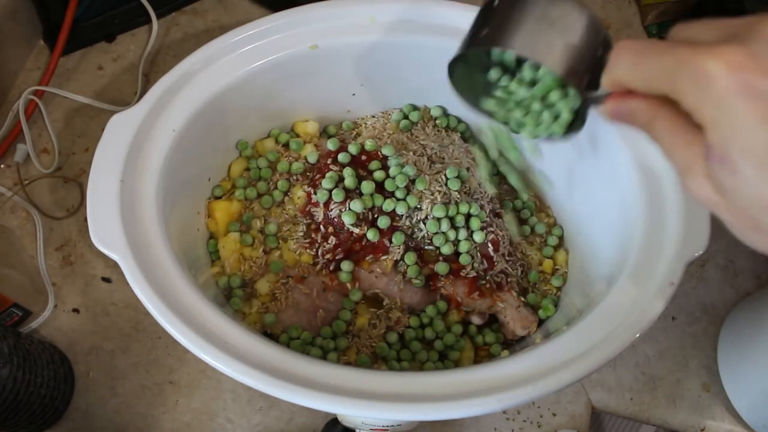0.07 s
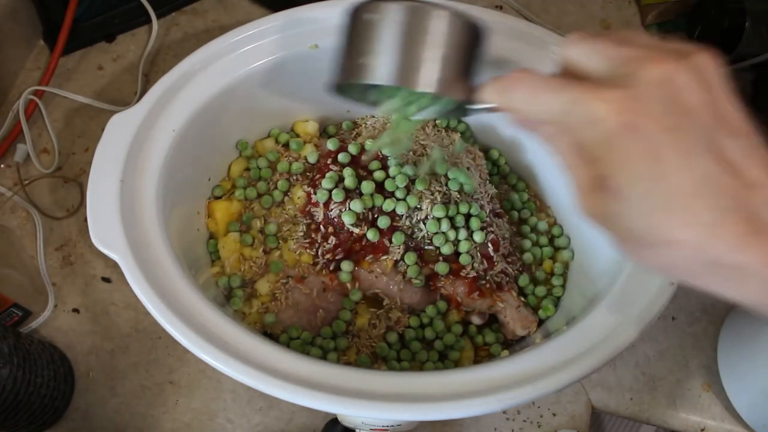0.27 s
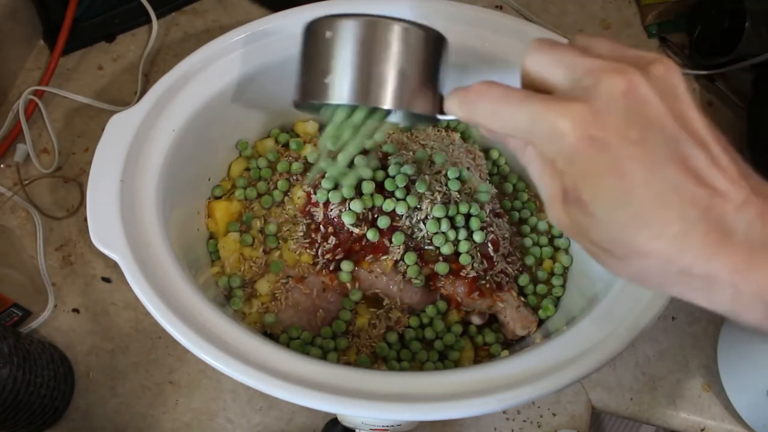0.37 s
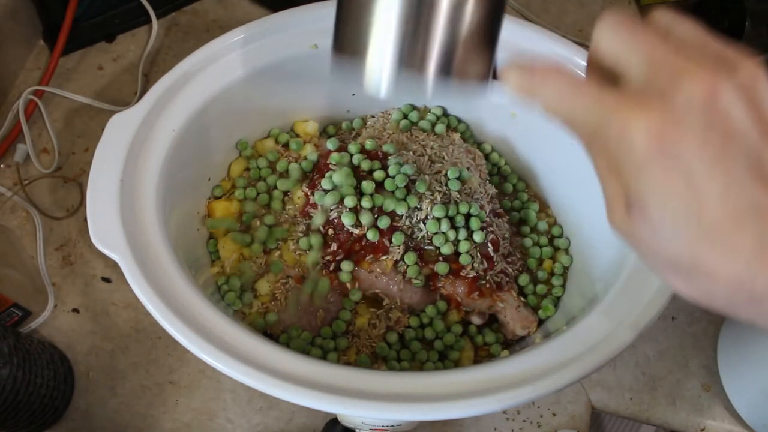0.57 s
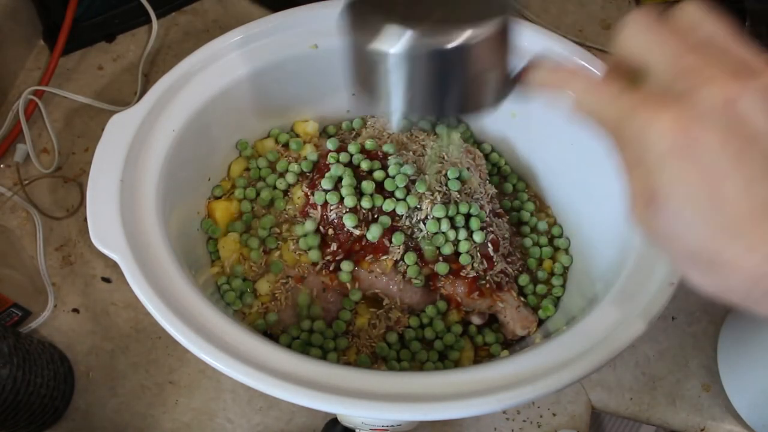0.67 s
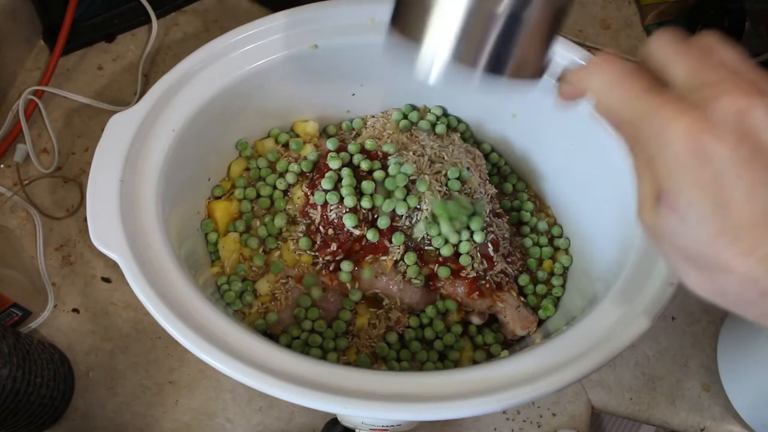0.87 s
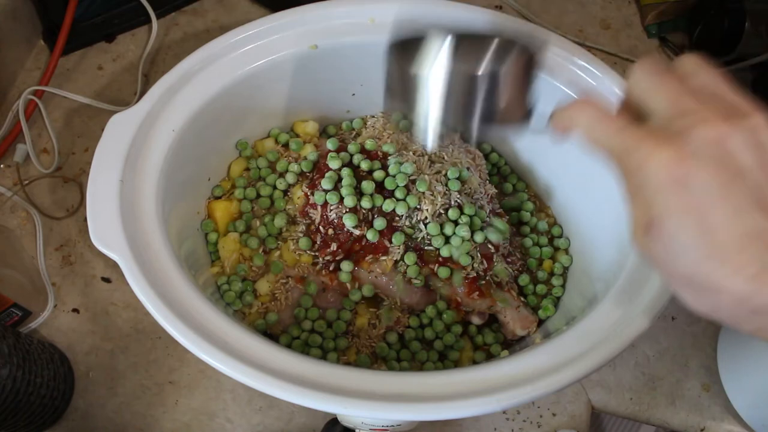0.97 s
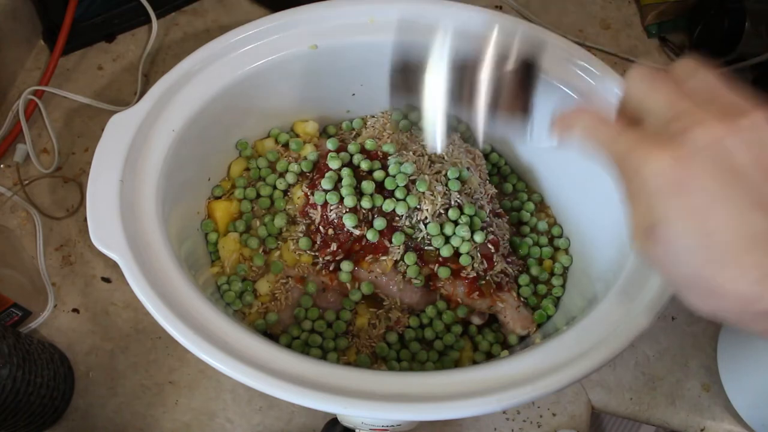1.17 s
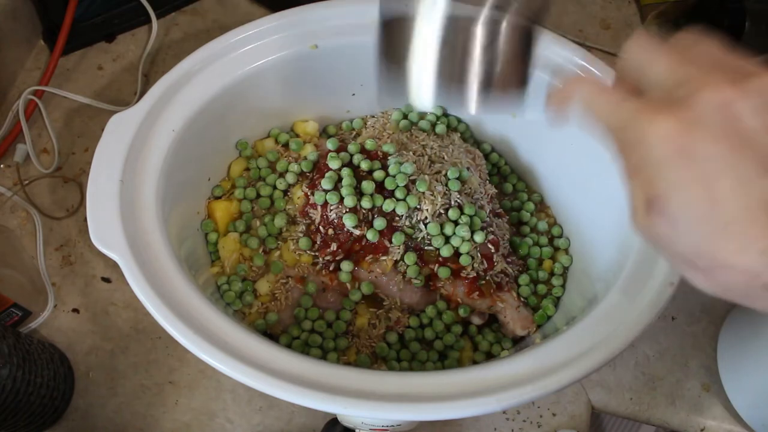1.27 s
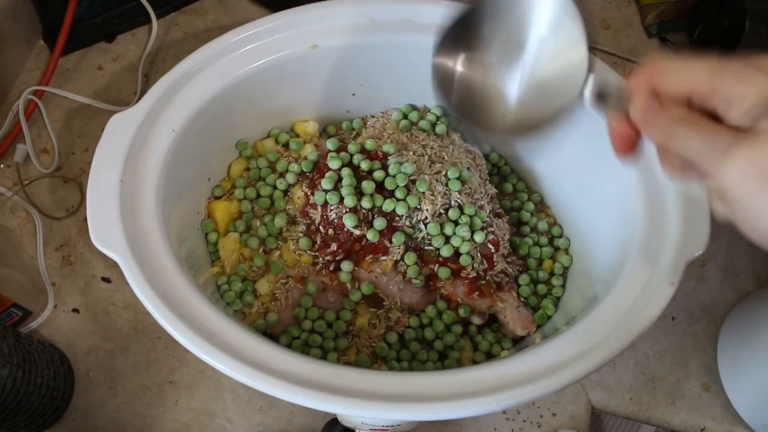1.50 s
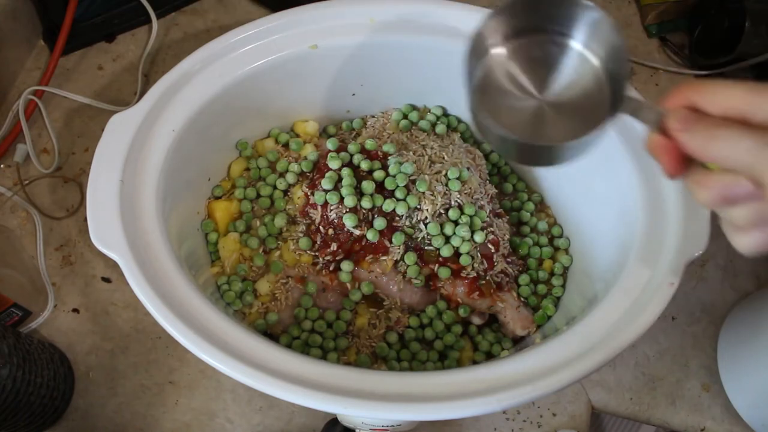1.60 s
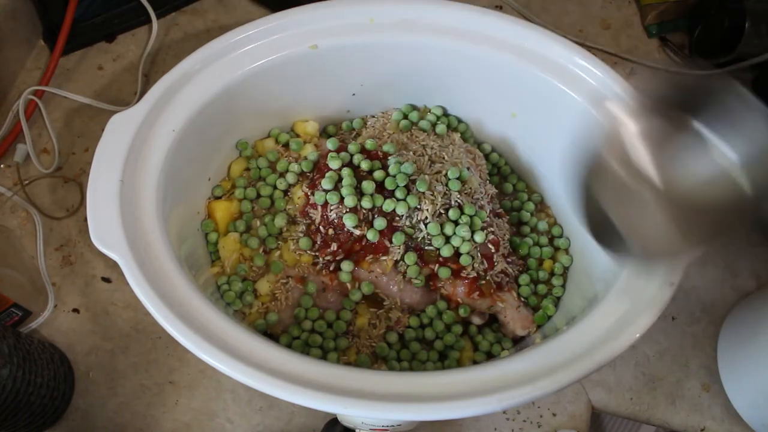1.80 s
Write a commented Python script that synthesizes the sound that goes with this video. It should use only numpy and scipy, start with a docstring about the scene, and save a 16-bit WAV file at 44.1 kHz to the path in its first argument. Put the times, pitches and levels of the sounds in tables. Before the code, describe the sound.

Frozen peas rattle from a metal cup onto food, then the cup clinks and rings.

```python
"""Frozen peas pour from a steel measuring cup onto food in a stoneware crock: a stream of small
impacts that tick, patter and excite the cup's damped modes. The emptied cup is knocked on the crock,
sheds its last peas and rings on in free vibration, fading in and out as the hand swings it away.
Crock and kitchen add reflections; an appliance hums over room noise and a few faint thuds.
An automatic gain control ducks under the clink."""
import sys
import numpy as np
from scipy import signal
from scipy.fft import rfft, irfft
from scipy.io import wavfile

SR = 44100
rng = np.random.default_rng(int(sys.argv[2]) if len(sys.argv) > 2 else 0)


def persist_wave(psi):
    """Save psi, clipped to +-1, as 16-bit WAV."""
    counts = np.round(np.clip(psi, -1, 1) * 32767).astype(np.int16)
    wavfile.write(sys.argv[1], SR, np.atleast_2d(counts).T)


N = 81585
TIME = np.arange(N) / SR

# Levels in the tables are relative; each source applies its own gain.
# envelope of the peas rattling along the cup: time_s, level_db
POUR_ENVELOPE = [(0, -45.5), (.045, -43), (.065, -33), (.16, -33), (.19, -37), (.25, -26), (.31, -37),
                 (.345, -34.5), (.43, -35), (.46, -29), (.5, -35.5), (.54, -30.5), (.59, -27), (.63, -30.5),
                 (.68, -27.5), (.7, -37.5), (.735, -32.5), (.76, -43.5), (.82, -44)]
# envelope of the last peas dropping and rolling on the food: time_s, level_db
LAST_PEAS_ENVELOPE = [(.9, -34), (1.01, -42), (1.028, -38), (1.045, -45), (1.065, -38), (1.1, -43.5),
                      (1.122, -42.5), (1.14, -39.5), (1.165, -33.5), (1.195, -39), (1.235, -40),
                      (1.255, -55.5), (1.272, -44), (1.31, -58.5)]
# spectrum of a pea's tick: frequency_hz, level_db
TICK_SPECTRUM = [(300, -12.5), (900, -25), (1700, -8.5), (3200, -10), (5500, -5.5), (8300, -1),
                 (11000, -15), (13000, -22), (15500, -30.5)]
# spectrum of peas landing on food: frequency_hz, level_db
PATTER_SPECTRUM = [(300, -5.5), (520, 5), (750, -1.5), (1400, 9), (2600, 6.5), (4200, 11.5), (6000, -3.5),
                   (8300, -6.5), (11000, -16.5), (15500, -30)]
# modes of the cup damped by its load: pitch_hz, level_db, t60_s, emptying_db_per_s
LOADED_CUP_MODES = [(891.5, -23.5, 0.11, -8), (1053, -13.5, 0.038, -16), (1388, -17, 0.042, 9),
                    (1690, -19, .03, 9.5), (2824, 2, 0.022, -16), (2973, -2.5, 0.029, -16.5),
                    (3398, -4.5, 0.055, 13.5), (4202, -2.5, 0.045, 13.5), (5050, -27, 0.032, 5),
                    (5300, -6.5, 0.012, 22.5), (6830, -9.5, 0.013, 8), (7320, -12, 0.031, -7),
                    (8030, -10, 0.017, -6), (9110, -34, 0.016, 1)]
# impacts of single hard peas: start_s, tick_db, ping_db
PEA_IMPACTS = [(.003, -50, -25), (0.0639, -27, -20.5), (0.157, -18.5, -17.5), (0.2034, -25.5, -14),
               (0.24, -25, -30), (0.2515, -17, -31), (0.2863, -13.5, -15), (0.289, -17, -31),
               (.320, -23, -49), (0.3268, -15, -17), (0.3385, -19.5, -25), (0.3942, -21, -15),
               (.441, -21.5, -13), (0.449, -13, -10), (.456, -44, -11), (0.511, -20, -31),
               (0.5473, -20.5, -47), (0.565, -16.5, -19), (0.584, -22, -42), (0.587, -22, -8.5),
               (0.599, -20.5, -7), (0.612, -20, -16.5), (0.6484, -37, -9), (0.6665, -38, -28),
               (0.674, -27, -10), (0.68, -20.5, -17), (0.713, -22, -29), (.7742, -20, -43),
               (0.7939, -21, -25.5), (.8097, -33, -6.5), (.93, -17, -16.5), (0.949, -20.5, -22),
               (1.025, -31, -34), (1.050, -33.5, -34), (1.127, -28, -31), (1.136, -37.5, -13.5),
               (1.141, -27.5, -26), (1.174, -31, -25.5), (1.187, -32.5, -19.5), (1.198, -33, -31.5),
               (1.266, -47.5, -22.5), (1.36, -43, -38.5), (1.637, -49, -58)]

# partials of the appliance: pitch_hz, level_db
HUM_PARTIALS = [(59.2, -51.5), (118.4, -55), (177.6, -53.5), (226.1, -50), (344.5, -56), (710.6, -54.5),
                (850.6, -68)]
# spectrum of the room's low noise: frequency_hz, level_db
RUMBLE_SPECTRUM = [(15, -65), (25, -18.5), (44, -7.5), (108, -10.5), (147, -13), (216, -2.5), (255, -11.5),
                   (645, -16), (702, -21.5), (1400, -23.5), (1820, -51), (3080, -120)]
# spectrum of the steady hiss: frequency_hz, level_db
HISS_SPECTRUM = [(800, -0.5), (1500, 3), (3000, 1), (6000, -7.5), (10000, -12.5), (15500, -17.5)]

# dull knocks on the crock: start_s, level_db, brightness_db_per_octave
CROCK_KNOCKS = [(.2035, -19, 2), (.2212, -11, -7), (.226, -19, 11), (.2395, -25, -23), (.3275, -17, 14),
                (.3405, -24, 34.5), (.8138, -27, 5), (.8202, 7, -1.5), (1.061, -17.5, 18.5),
                (1.085, -31.5, -12.5), (1.109, -24, -2.5)]
# modes of the stoneware: pitch_hz, level_db, t60_s
CROCK_MODES = [(496, -39.5, 0.016), (853.6, -22.5, 0.21), (1083, -4.5, 0.048), (1187, -3, 0.026),
               (1460, -10.5, 0.052), (1719, -5.5, 0.033), (1820, -29, 0.013), (1917, -12.5, 0.037),
               (2690, -18.5, 0.013)]
# soft low thuds: start_s, pitch_hz, level_db
THUDS = [(0.531, 171, -41), (0.576, 94, -35), (1.308, 126, -44), (1.365, 135, -38), (1.663, 107, -36),
         (1.78, 194, -35)]

# the cup grazes the crock, then hits it: start_s, level_db
CUP_STRIKES = [(.8139, -27), (.8201, 0)]
# spectrum of the steel's contact: frequency_hz, level_db
CRACK_SPECTRUM = [(300, -41.5), (600, -18), (1200, -3.5), (2700, -2), (4200, -19), (6000, 9), (8500, -10),
                  (11000, -16), (13000, -27), (15500, -35)]
# spectrum of the steel's dense, quickly dying upper modes: frequency_hz, level_db
SHIMMER_SPECTRUM = [(600, -26.5), (2000, -6), (4500, -4.5), (8000, 9), (11000, -2), (13500, -14.5),
                    (15500, -11)]
# modes of the empty cup: pitch_hz, level_db, t60_s
EMPTY_CUP_MODES = [(1681, -12, .9), (2665, -14, 1.5), (2720, -6.5, 2.0), (3997, -14, 1.45),
                   (5516, -16, 1.15), (7236, -17, .65), (853, -21, .6), (1639, -7, .29), (2062, -31, .5),
                   (2677, -23, 1.3), (3114, 1, .26), (4213, -13, .15), (4594, -17, .3), (4656, -6, .24),
                   (6406, -23, .35), (6832, -6, .23), (8000, -31, .45), (8446, -29, .45), (8979, -10, .23),
                   (9012, -15, .23), (10770, -27, .26), (11020, -16, .18)]
# the swinging cup turns a quiet side to the listener: centre_s, depth_db (at RING_REF_HZ), half_width_s
RADIATION_NULLS = [(.886, 9, .018), (1.016, 9, .01), (1.068, 11, .013), (1.175, 11, .009),
                   (1.243, 13, .011), (1.363, 7, .009), (1.418, 11, .014), (1.524, 9, .024)]
RING_REF_HZ = 2720
# stereo balance of the moving cup: time_s, left_minus_right_db
CUP_BALANCE = [(0, -2), (.7, -2.8), (1.0, 1.4), (1.25, -3), (1.52, -2.5), (1.63, 5.5), (1.85, 4.5)]


def from_db(db):
    """Amplitude grows tenfold for every 20 decibels."""
    return 10 ** (np.asarray(db) / 20)


def unit_power(x):
    """Division by the RMS value gives unit power."""
    return x / np.sqrt(np.mean(x ** 2) + 1e-20)


def envelope(curve):
    """Gain interpolated in decibels along a curve, silent outside it."""
    time_s, level_db = np.transpose(curve)
    return from_db(np.interp(TIME, time_s, level_db, left=-120, right=-120))


def pan(left_minus_right_db):
    """A level difference between the ears gives direction."""
    return from_db(left_minus_right_db * np.array([[.5], [-.5]]))


def drift(corner_hz):
    """Low-passed noise wanders slowly, with a spread of about 1."""
    step, settle = 40, 2000
    pole = np.exp(-2 * np.pi * corner_hz * step / SR)
    noise = rng.standard_normal(N // step + settle + 2)
    slow = signal.lfilter([1], [1, -2 * pole, pole * pole], noise)[settle:]
    return np.interp(np.arange(N) / step, np.arange(len(slow)), unit_power(slow))


def impulses(start_s, level_db):
    """Each brief contact acts as one impulse."""
    train = np.zeros(N)
    np.add.at(train, (np.asarray(start_s) * SR).astype(int), from_db(level_db))
    return train


def convolve(x, response):
    """A linear system convolves its input with its impulse response."""
    return signal.fftconvolve(x, response)[:N]


def colour(x, spectrum, size=8192):
    """A minimum-phase filter of unit energy imposes a spectrum."""
    hz, db = np.transpose(spectrum)
    bins_hz = np.maximum(np.arange(size // 2 + 1) * SR / size, 1)
    magnitude = from_db(np.interp(np.log(bins_hz), np.log(hz), db))
    cepstrum = irfft(np.log(magnitude))
    response = irfft(np.exp(2 * rfft(cepstrum[:size // 2], size) - cepstrum[0]))
    return convolve(x, response / np.linalg.norm(response))


def decay(t60_s):
    """Damping lowers the level by 60 dB in each t60."""
    return from_db(-60 * TIME / t60_s)


def resonate(force, pitch_hz, level_db, t60_s):
    """One mode answers each impulse with a damped sinusoid."""
    return convolve(force, from_db(level_db) * decay(t60_s) * np.sin(2 * np.pi * pitch_hz * TIME))


def noise_tail(t60_s):
    """Dense modes or echoes merge into decaying noise, here of unit energy."""
    burst = rng.standard_normal(N) * decay(t60_s)
    return burst / np.linalg.norm(burst)


def pea_contacts(rate_per_s=900, spread_db=5):
    """Independent impacts of uneven size form a Poisson process."""
    sizes = from_db(spread_db * np.minimum(rng.exponential(1, N), 3))
    signs = rng.choice([-1, 1], N)
    return unit_power(sizes * signs * (rng.random(N) < rate_per_s / SR))


def pouring_peas():
    """Many small impacts superpose: peas tick, ping the cup and patter on the food."""
    ticks = colour(pea_contacts(), TICK_SPECTRUM)
    pings = unit_power(loaded_cup([pea_contacts() for mode in LOADED_CUP_MODES]))
    patter = colour(pea_contacts(), PATTER_SPECTRUM)
    last_peas = colour(pea_contacts(), PATTER_SPECTRUM)
    stream = from_db(-10) * ticks + from_db(-6.5) * pings + from_db(-5.5) * patter
    return envelope(POUR_ENVELOPE) * stream + envelope(LAST_PEAS_ENVELOPE) * last_peas


def loaded_cup(forces, half_empty_s=.47, empty_s=.7):
    """One force drives each damped mode; the balance of the modes shifts as the cup empties."""
    emptying_s = np.minimum(TIME, empty_s) - half_empty_s
    return sum((-1) ** k * resonate(force * from_db(db_per_s * emptying_s), hz, db, t60_s)
               for k, (force, (hz, db, t60_s, db_per_s)) in enumerate(zip(forces, LOADED_CUP_MODES)))


def hard_peas():
    """Single impacts stand out: each ticks, crunches as its frost crumbles and excites the cup."""
    start_s, tick_db, ping_db = np.transpose(PEA_IMPACTS)
    ticks = impulses(start_s, tick_db + 8)
    crumbs = convolve(ticks, decay(t60_s=.018)) * rng.standard_normal(N)
    crunch = from_db(1.5) * crumbs * np.linalg.norm(ticks) / np.linalg.norm(crumbs)
    forces = [impulses(start_s, ping_db - 13 + 2 * rng.standard_normal(len(start_s)))
              for mode in LOADED_CUP_MODES]
    return colour(ticks + crunch, TICK_SPECTRUM) + loaded_cup(forces)


def crock_reflections(x, t60_s=.032):
    """Early reflections inside the crock are partly correlated between the ears."""
    shared = noise_tail(t60_s)
    return np.array([convolve(x, .75 * shared + .65 * noise_tail(t60_s)) for ear in range(2)])


def kitchen_reverberation(stereo, t60_s=.27, cutoff_hz=9000):
    """Diffuse reflections form a tail, dulled by absorption at the walls."""
    walls = signal.butter(1, cutoff_hz, fs=SR, output="sos")
    return np.array([convolve(side, signal.sosfilt(walls, noise_tail(t60_s))) for side in stereo])


def appliance_hum():
    """Steady vibration radiates partials, each wavering in level and phase."""
    hum = np.zeros(N)
    for pitch_hz, level_db in HUM_PARTIALS:
        amplitude = np.sqrt(2) * from_db(level_db + 2.7 * drift(corner_hz=1))
        phase = 2 * np.pi * (pitch_hz * TIME + rng.random()) + .1 * drift(corner_hz=1.6)
        hum += amplitude * np.sin(phase)
    return hum


def room_noise(spectrum, side_db):
    """Independent mid and side noises give a partly correlated stereo field."""
    mid, side = (colour(rng.standard_normal(N), spectrum) for part in range(2))
    return mid + from_db(side_db) * side * np.array([[1], [-1]])


def crock_knocks(pivot_hz=1500):
    """Damped stoneware modes ring briefly; harder contacts favour the higher ones."""
    start_s, level_db, db_per_octave = np.transpose(CROCK_KNOCKS)
    knocks = np.zeros(N)
    for k, (pitch_hz, mode_db, t60_s) in enumerate(CROCK_MODES):
        force = impulses(start_s, level_db - 5.5 + db_per_octave * np.log2(pitch_hz / pivot_hz))
        knocks += (-1) ** k * resonate(force, pitch_hz, mode_db, t60_s)
    return knocks


def low_thuds():
    """Each faint thud is the impulse response of one low mode."""
    return sum(resonate(impulses([start_s], [db]), hz, level_db=0, t60_s=.21)
               for start_s, hz, db in THUDS)


def cup_clink():
    """Hard contact of steel on stoneware is broadband: a crack, then a shimmer of dense modes."""
    force = impulses(*np.transpose(CUP_STRIKES))
    crack = colour(.63 * force + convolve(force, noise_tail(t60_s=.035)), CRACK_SPECTRUM)
    shimmer = colour(convolve(force, noise_tail(t60_s=.32)), SHIMMER_SPECTRUM)
    return from_db(14) * crack + from_db(8) * shimmer


def null_depth_db(scatter_s=.003):
    """Directional radiation: the level dips each time a null sweeps past an ear."""
    return sum(depth_db * np.exp(-((TIME - centre_s - scatter_s * rng.standard_normal()) / width_s) ** 2)
               for centre_s, depth_db, width_s in RADIATION_NULLS)


def cup_ring(sway_hz=11, tilt_db_per_octave=-.07):
    """The swinging cup vibrates freely; nulls and shifting reflections vary its high modes most."""
    force = impulses(*np.transpose(CUP_STRIKES))
    stereo = np.zeros((2, N))
    for pitch_hz, level_db, t60_s in EMPTY_CUP_MODES:
        ratio = pitch_hz / RING_REF_HZ
        gain = from_db(level_db + .5 + tilt_db_per_octave * np.log2(ratio))
        ring = convolve(force, gain * decay(t60_s) * np.exp(2j * np.pi * pitch_hz * TIME))
        sway = .2 * ratio   # strength of the reflections against the direct path
        shared_paths = drift(sway_hz) + 1j * drift(sway_hz)
        for ear in range(2):
            fade = from_db(-null_depth_db() * ratio ** .7)
            own_paths = drift(sway_hz) + 1j * drift(sway_hz)
            interference = 1 + sway * (.6 * shared_paths + .5 * own_paths)
            stereo[ear] += (ring * interference).imag * fade / np.sqrt(1 + sway ** 2)
    return stereo


def scene(low_cut_hz=330):
    """Direct sound, reflections and background add by superposition."""
    low_cut = signal.butter(2, low_cut_hz, "high", fs=SR, output="sos")
    impacts = signal.sosfilt(low_cut, pouring_peas() + hard_peas() + crock_knocks() + cup_clink())
    impacts = impacts + from_db(-1.5) * crock_reflections(impacts)
    ring = signal.sosfilt(low_cut, cup_ring()) * pan(-1)
    near = (impacts + ring) * pan(np.interp(TIME, *np.transpose(CUP_BALANCE)))
    reverberation = from_db(-15) * kitchen_reverberation(impacts + .2 * ring)
    hum = from_db(-.5) * appliance_hum()
    rumble = from_db(-46) * room_noise(RUMBLE_SPECTRUM, side_db=-9)
    hiss = from_db(-55) * room_noise(HISS_SPECTRUM, side_db=-3.5)
    return near + reverberation + (hum + rumble) * pan(1.4) + hiss + low_thuds()


def record(dry):
    """Gain control ducks fast above full scale and recovers slowly; overshoot clips; the top is cut."""
    attack_s, lookahead_s, release_db_per_s, stopband_hz = .0007, .0007, 50, 16500
    excess_db = np.maximum(20 * np.log10(np.abs(dry).max(axis=0) + 1e-9), 0)
    release_db = release_db_per_s * TIME
    held_db = np.maximum.accumulate(excess_db + release_db) - release_db
    pole = np.exp(-1 / (attack_s * SR))
    smoothed_db = signal.lfilter([1 - pole], [1, -pole], held_db)
    duck_db = np.interp(TIME + lookahead_s, TIME, smoothed_db)
    clipped = np.clip(dry * from_db(-duck_db), -1, 1)
    return signal.sosfilt(signal.cheby2(14, 70, stopband_hz, fs=SR, output="sos"), clipped)


dry = scene()
out = record(dry)
persist_wave(out)
```